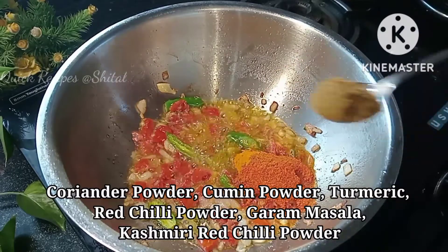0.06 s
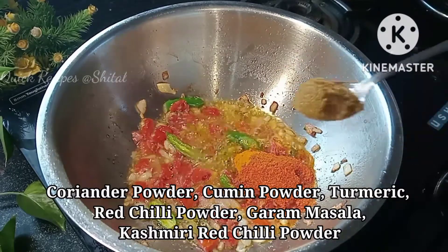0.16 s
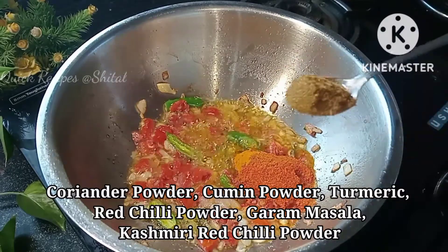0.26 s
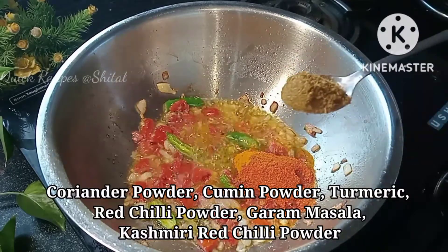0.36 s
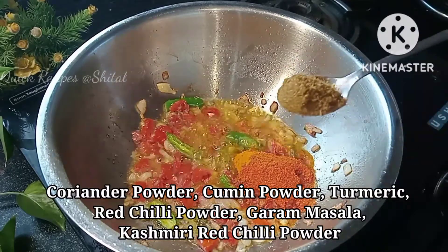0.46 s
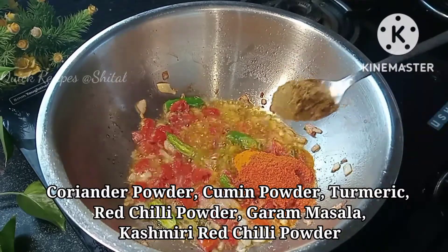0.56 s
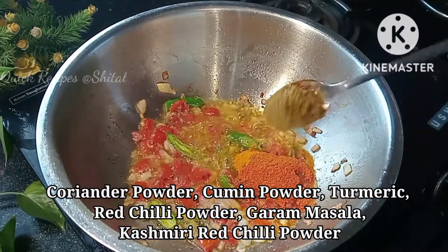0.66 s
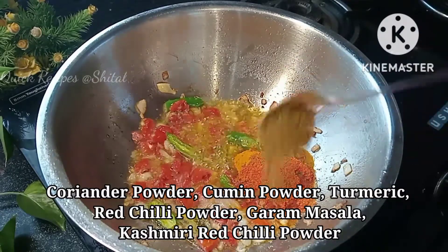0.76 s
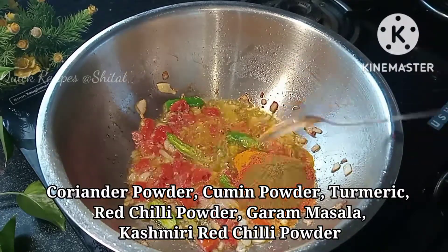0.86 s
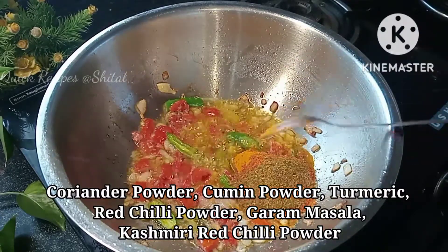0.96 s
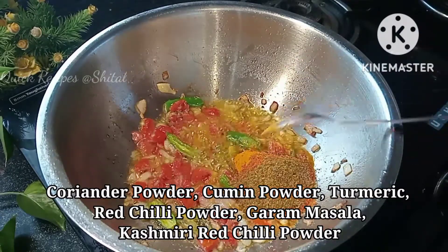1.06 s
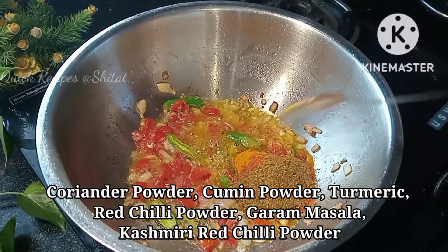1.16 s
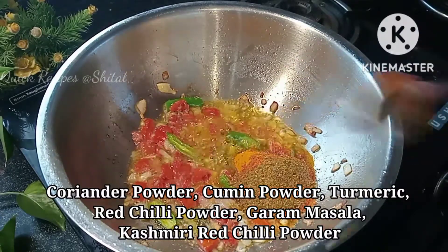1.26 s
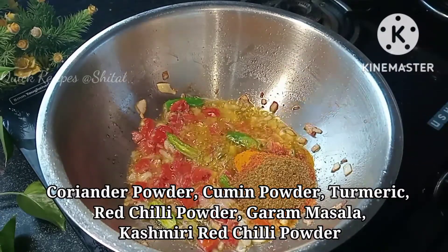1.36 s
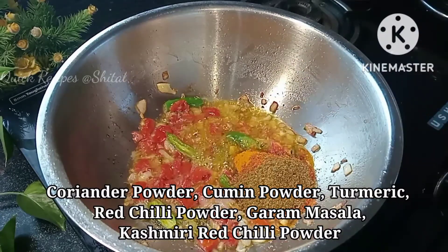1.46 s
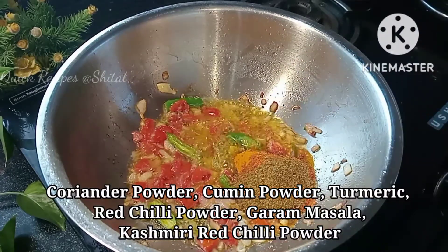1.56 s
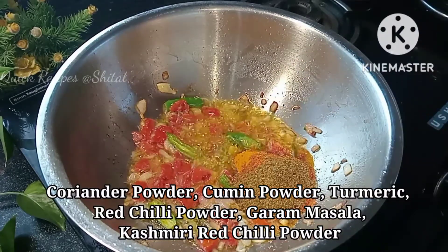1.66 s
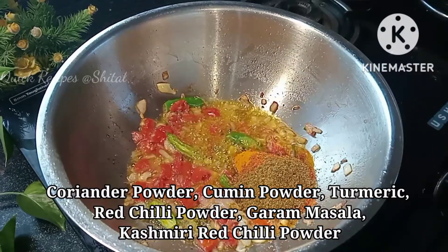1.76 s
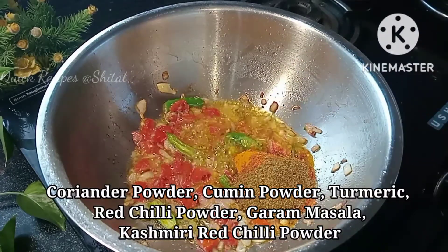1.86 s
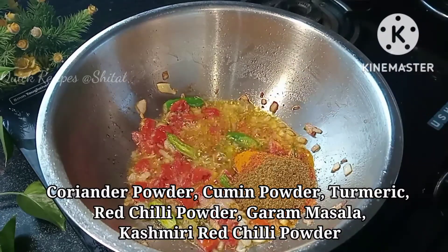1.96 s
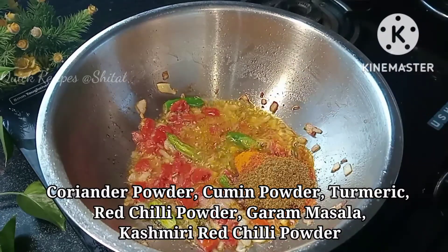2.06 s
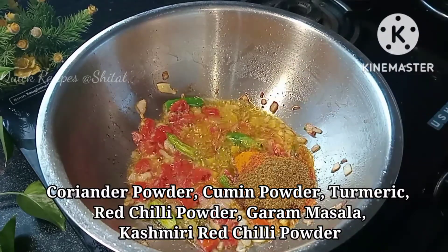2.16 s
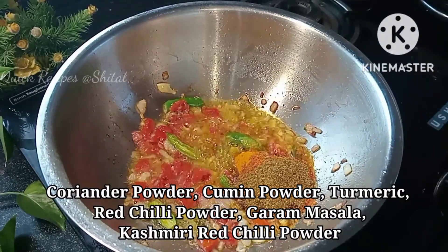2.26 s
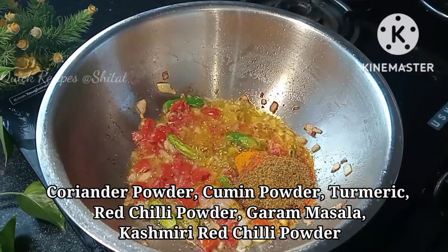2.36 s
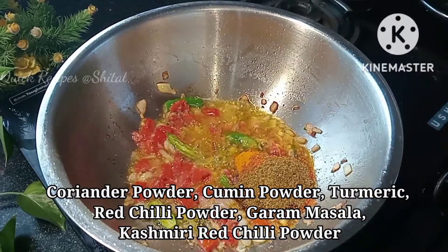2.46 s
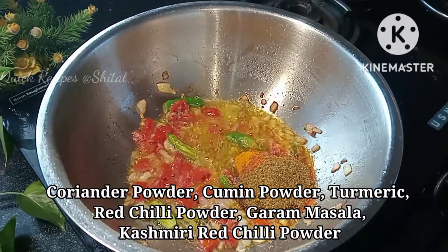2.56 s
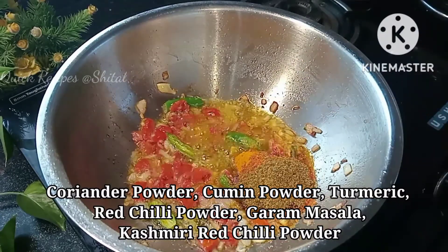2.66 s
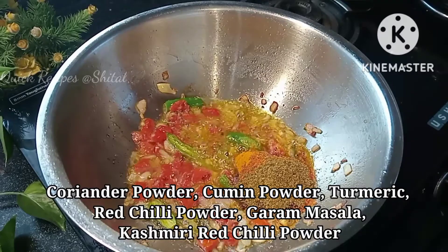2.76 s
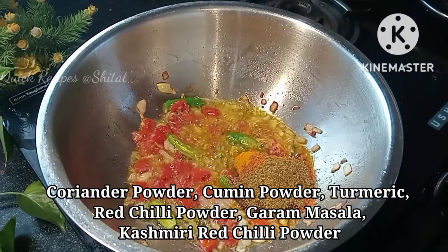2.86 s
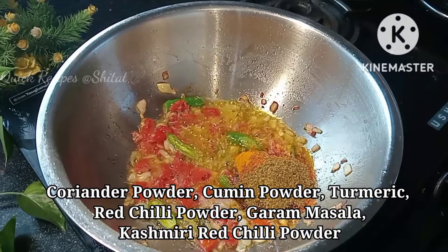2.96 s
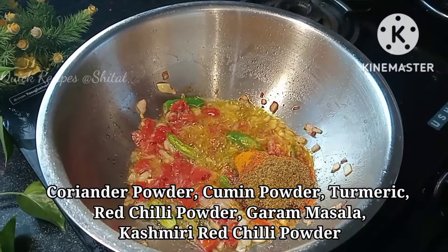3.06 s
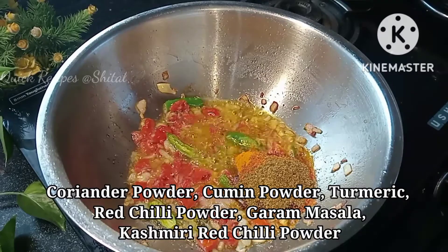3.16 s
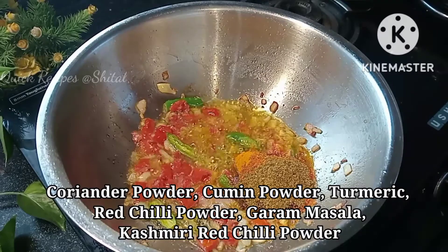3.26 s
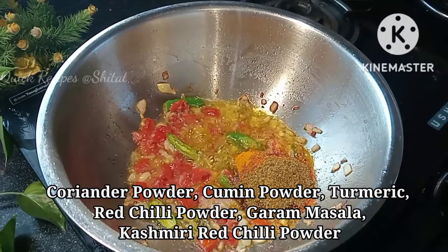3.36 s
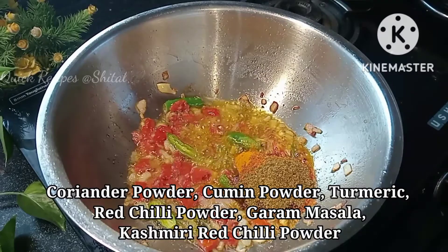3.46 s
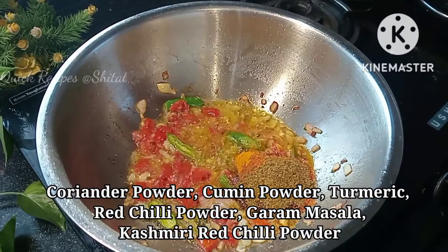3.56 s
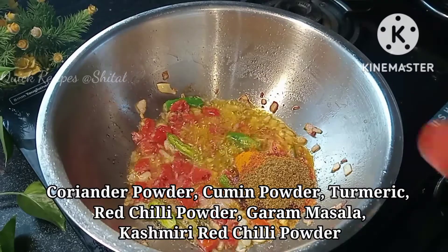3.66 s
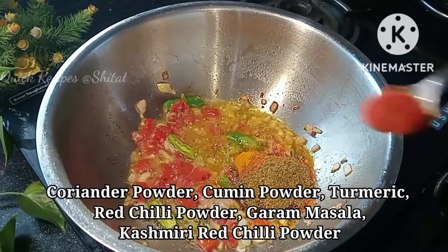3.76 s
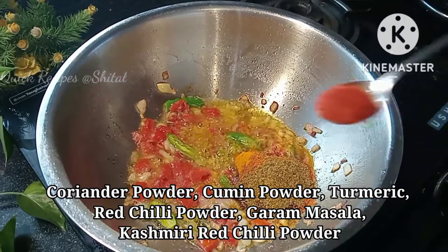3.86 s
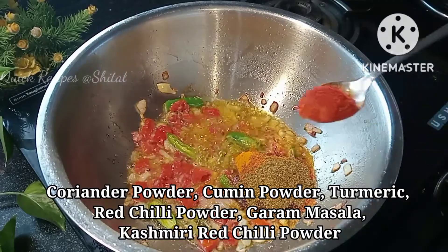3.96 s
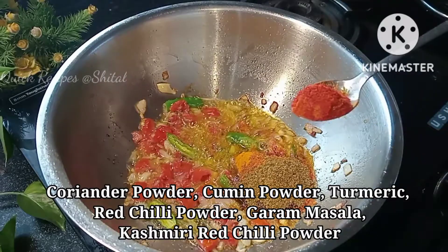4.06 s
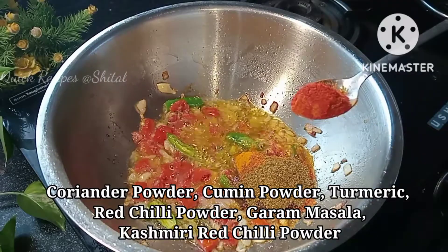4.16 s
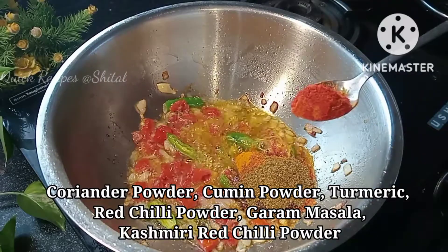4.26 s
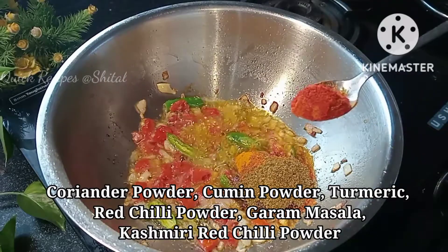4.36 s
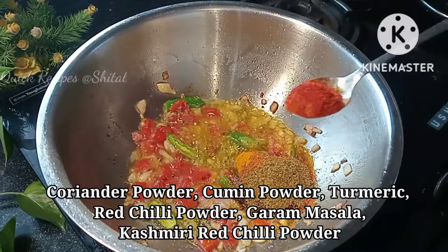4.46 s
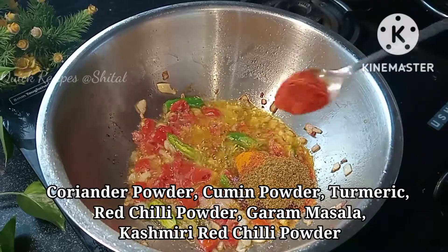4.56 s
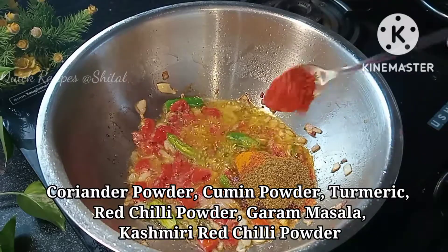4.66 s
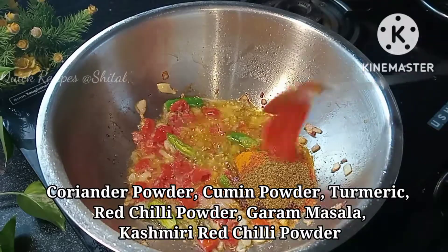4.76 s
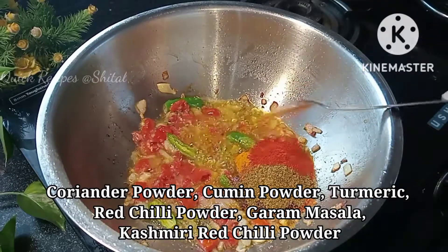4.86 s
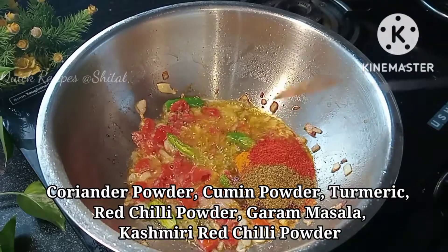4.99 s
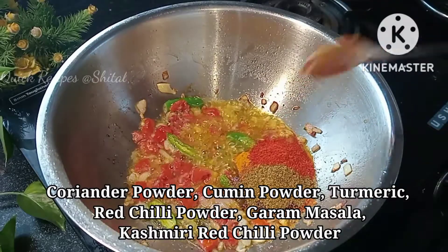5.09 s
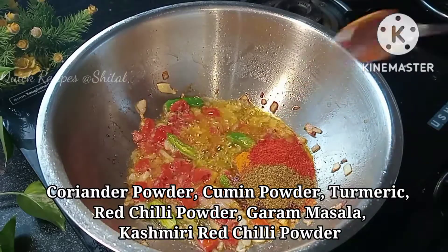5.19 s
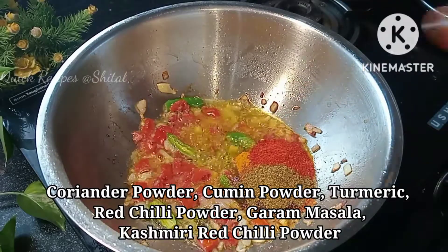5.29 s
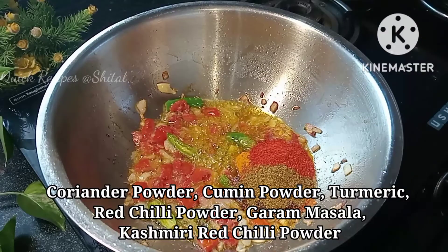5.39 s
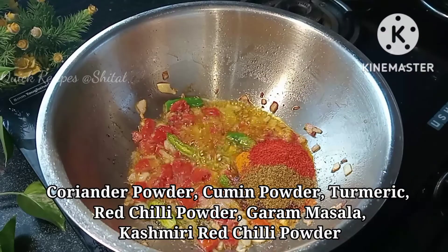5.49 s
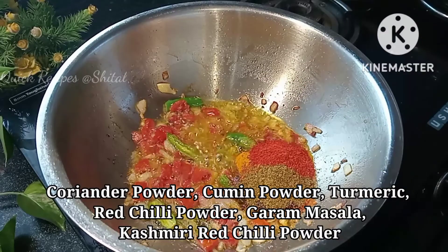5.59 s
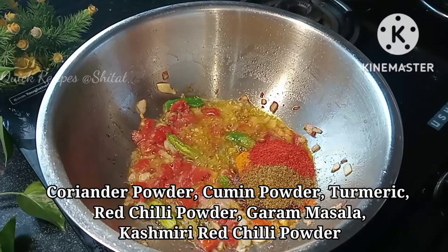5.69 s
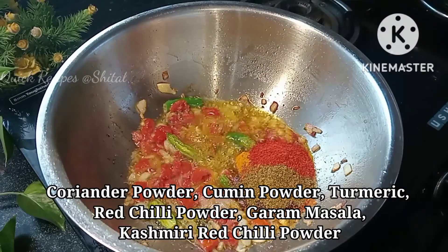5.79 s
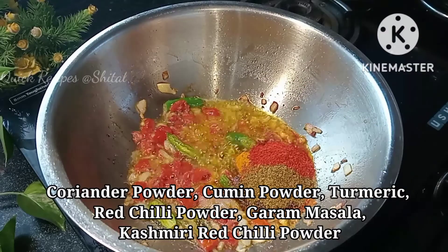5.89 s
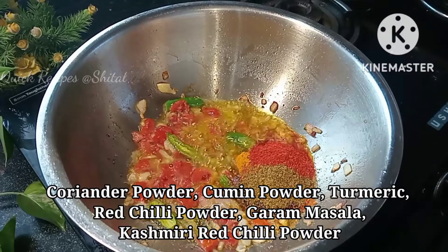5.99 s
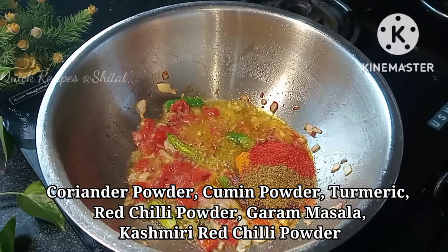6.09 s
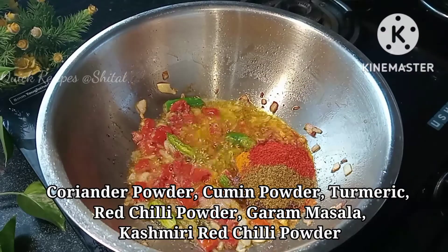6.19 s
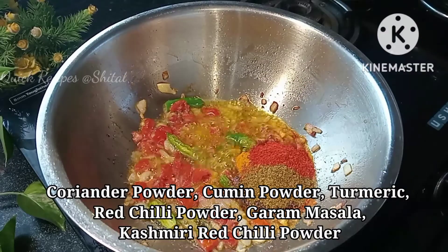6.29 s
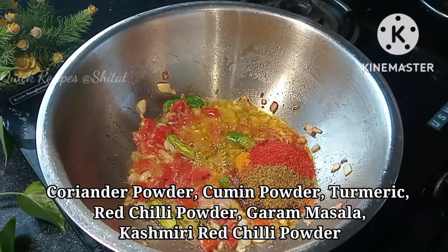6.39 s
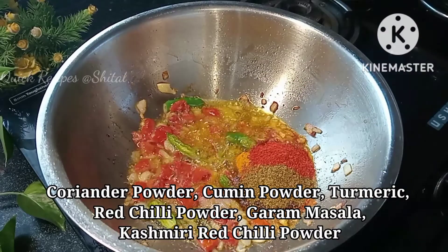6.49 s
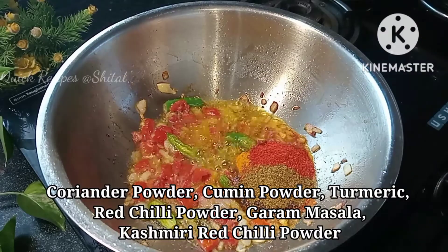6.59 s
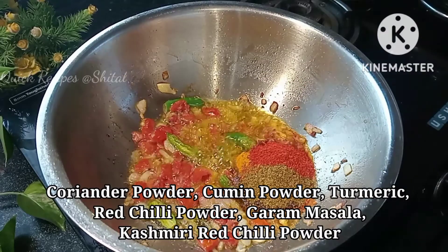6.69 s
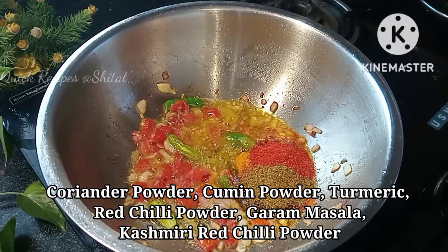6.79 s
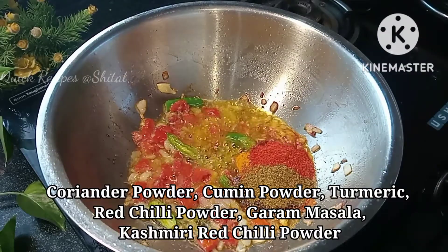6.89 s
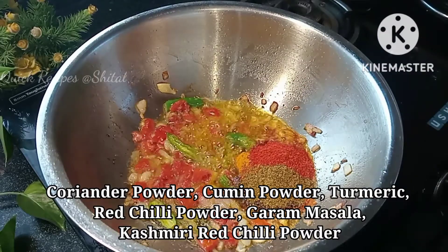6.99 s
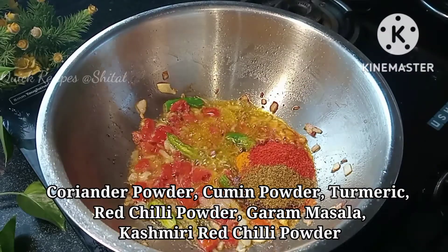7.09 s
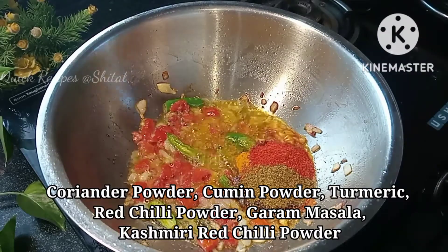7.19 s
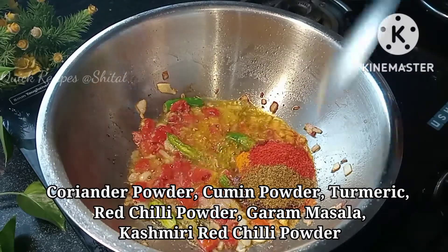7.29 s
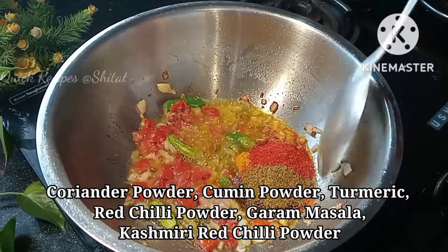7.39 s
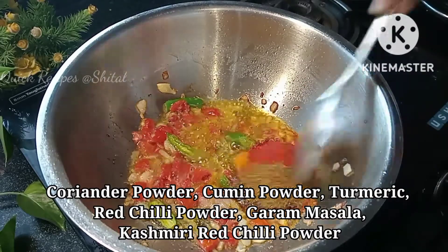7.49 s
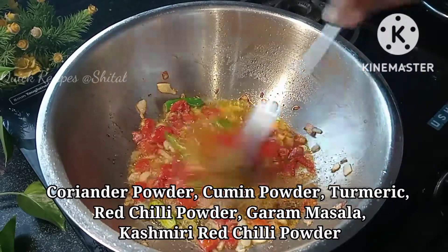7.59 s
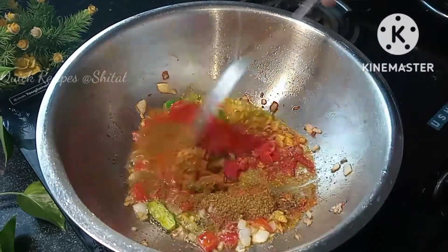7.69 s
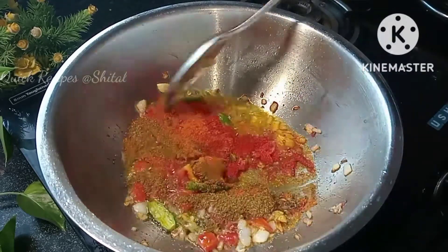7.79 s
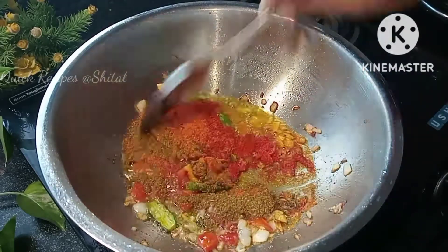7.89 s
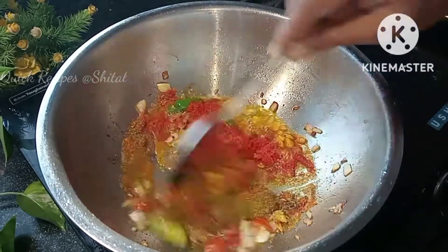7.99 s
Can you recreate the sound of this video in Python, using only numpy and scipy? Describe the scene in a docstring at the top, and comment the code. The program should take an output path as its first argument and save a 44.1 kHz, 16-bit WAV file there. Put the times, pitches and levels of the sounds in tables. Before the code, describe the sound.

Dense, crisp sizzling fills a close microphone, with irregular tiny oil spits and a low, hollow burner roar beneath. A faint teaspoon tink comes early, followed by soft thuds, then a sharper bright tap midway. Finally a steel ladle hits the wok with a high ring and rattle, and stirring makes the frying swell strongly. Slight room reflections, little deep bass.

```python
"""Frying: chopped vegetables sizzle in oil in a steel wok, a mass of random steam bursts over smooth hiss.
Filtered noise makes the gas flame's roar, and single drops of oil spit as very short blips with spray. A
teaspoon taps twice and a ladle strikes near the end: ringing modes plus rattling noise. Dull knocks and thuds
sound, with low booms as the wok rocks on its stand after the blows; a faint hum comes and goes, and last the
ladle scrapes round the pan while the sizzle is much louder."""
import sys
import numpy as np
from scipy import signal
from scipy.fft import rfft, irfft, next_fast_len
from scipy.io import wavfile

SR = 44100
rng = np.random.default_rng(int(sys.argv[2]) if len(sys.argv) > 2 else 0)


def generate_wav(sig):
    """Save sig (samples, or channels by samples) to the path in sys.argv[1] as 16-bit PCM at SR."""
    pcm = np.round(np.clip(np.atleast_2d(sig).T, -1, 1) * 32767).astype(np.int16)
    wavfile.write(sys.argv[1], SR, pcm)


N = 354563

# rim modes of the wok, lowest first: pitch_hz, level_db, t60_s (each blow scales level and t60)
WOK_MODES = [(345, -48, .55), (987, -39, .6), (1873, -38, .38), (2956, -33, .65), (4184, -32.5, .55),
             (5536, -39, .25), (6922, -29, .55), (8510, -36, .25)]
# modes of the teaspoon: pitch_hz, level_db (each blow shifts it), t60_s
SPOON_MODES = [(3157, -28, .07), (6869, -35, .35), (6930, -19, .13), (7052, -36, .55), (7827, -38, .15),
               (8188, -40, .35), (8320, -36, .25), (8680, -39, .28), (9254, -39, .35), (9549, -36, .4),
               (10048, -37, .28), (10150, -38, .32), (11270, -41, .35), (12040, -37, .35),
               (12088, -36, .22), (12300, -43, .3), (12640, -43, .35), (13790, -52, .4), (14550, -48, .26),
               (15110, -49, .25)]
# modes of the ladle: pitch_hz, level_db (each blow shifts it), t60_s
LADLE_MODES = [(2385, -47, .35), (5691, -37, .55), (5703, -33, .5), (6855, -39, .55), (8140, -36, .45),
               (8255, -40, .5), (8375, -38, .55), (8505, -38, .7), (8675, -39, .9), (9261, -31, .5),
               (9327, -34, .6), (9540, -32, .6), (9680, -34, .6), (10049, -45, .6), (10400, -38, .8),
               (10750, -44, .7), (12340, -48, .45), (12820, -43, .3), (13780, -49, .45), (14522, -47, .35)]


def from_db(db):
    """Turn decibels into a gain."""
    return 10 ** (np.asarray(db) / 20)


def rms_one(x):
    """Scale a sound to an rms of 1."""
    return x / np.sqrt(np.mean(x ** 2) + 1e-20)


def in_time(rows):
    """Columns of a table whose first column is seconds, one value a sample."""
    s, *columns = np.transpose(rows)
    return [np.interp(np.arange(N) / SR, s, column) for column in columns]


def colour(x, spectrum):
    """Filter a sound by a curve of (Hz, dB), joined by straight lines over log frequency."""
    size = next_fast_len(len(x))
    points = np.array(spectrum)
    hz = np.arange(size // 2 + 1) * SR / size + 1
    curve_db = np.interp(np.log(hz), np.log(points[:, 0]), points[:, 1])
    return irfft(rfft(x, size) * from_db(curve_db), size)[:len(x)]


def drift(rate_hz):
    """Slow chance: noise at every 20th sample through a double one-pole low-pass, rms 1."""
    r = np.exp(-40 * np.pi * rate_hz / SR)
    noise = rng.standard_normal(N // 20 + 3002)
    slow = signal.lfilter([1], [1, -2 * r, r * r], noise)[3000:]   # drop the filter's start-up
    return np.interp(np.arange(N) / 20, np.arange(len(slow)), rms_one(slow))


def resonate(x, hz, width_hz):
    """A two-pole resonance with gain 1 at its peak."""
    r = np.exp(-np.pi * width_hz / SR)
    feed = np.array([1, 0, -1]) * (1 - r * r) / 2
    return signal.lfilter(feed, [1, -2 * r * np.cos(2 * np.pi * hz / SR), r * r], x)


def add(out, s, sound):
    """Mix a short sound in at s seconds."""
    i = round(s * SR)
    out[i:i + len(sound)] += sound[:N - i]


def blip(hz, cycles):
    """A few cycles that swell fast and die, envelope height 1; also gives the seconds to the crest."""
    rise = cycles / hz / 9
    t = np.arange(round(12 * rise * SR) + 2) / SR
    swell = t / rise * np.exp(1 - t / rise)
    return np.cos(2 * np.pi * hz * (t - rise)) * swell, rise


def bubbles(per_s, spread_db, cycles, clump_db):
    """Steam bursts at random moments, sizes and pitches, each ringing a few cycles, in drifting clumps."""
    sizes = from_db(spread_db * np.minimum(rng.exponential(1, N), 4)) * rng.choice([-1, 1], N)
    born = rng.random(N) < per_s * from_db(clump_db * drift(25)) / SR
    pitches = np.geomspace(1000, 16000, 16)
    dealt = rng.integers(0, 16, N)
    out = 0
    for k, hz in enumerate(pitches):
        width = 3.14 * hz / cycles
        bursts = sizes * born * (dealt == k) + 1e-18
        out = out + resonate(resonate(bursts, hz, width), hz, width)
    return rms_one(out)


def sizzle(level_db):
    """Boiling in the oil: a dense fizz, a sparser crackle and the smooth hiss of steam, brightest near 9 kHz."""
    # colour of the sizzle: pitch_hz, level_db (per Hz)
    sizzle_colour = [(710, -59), (1200, -16), (1360, -9.5), (1860, -14), (2090, -10.5), (2320, -14),
                     (4600, -4), (7350, -9), (9300, 1.5), (9810, -1), (12100, -16), (14900, -16),
                     (15400, -9.5)]
    fizz = bubbles(14000, spread_db=1.5, cycles=5.35, clump_db=3.0)
    crackle = bubbles(600, spread_db=5.0, cycles=16.0, clump_db=3.0)
    steam = rng.standard_normal(N)
    crackle_db = -4 + 0.1 * (level_db - level_db[0])   # the crackle gains a little as the sizzle swells
    mix = fizz + from_db(crackle_db) * crackle + from_db(-2.0) * steam
    return from_db(level_db + 0.7 * drift(8)) * rms_one(colour(mix, sizzle_colour))


def flame(roar_db, hollow_db):
    """Gas flame: a broad roar with the hollow under the wok singing along, over a low rumble."""
    # colour of the roar: pitch_hz, level_db (per Hz)
    roar_colour = [(59, -31), (100, -27), (124, -8), (253, -4.5), (406, -6), (695, -8), (1070, -5),
                   (1360, -2.5), (1860, -7.5), (2500, -6.5), (3250, -5.5), (5500, -120)]
    # air resonances under the wok: pitch_hz, width_hz (of each of two passes), level_db (relative)
    air_modes = [(744, 252, 1.5), (1356, 170, -5)]
    rumble_hz, rumble_width_hz, rumble_db = 76, 30, -65.5
    broad = rms_one(colour(rng.standard_normal(N), roar_colour))
    air = rng.standard_normal(N) * from_db(2.5 * drift(27))
    hollow = 0
    for hz, width, db in air_modes:
        hollow = hollow + from_db(db) * rms_one(resonate(resonate(air, hz, width), hz, width))
    low = resonate(rng.standard_normal(N), rumble_hz, rumble_width_hz)
    low = rms_one(resonate(low, rumble_hz, 2 * rumble_width_hz))
    return from_db(roar_db) * broad + from_db(hollow_db) * hollow + from_db(rumble_db) * low


def spits():
    """Each drop bursts as a very short blip with a puff of spray, echoed faintly by the wok's curved wall."""
    # large drops of oil: crest_s, peak_db (before the colour), pitch_hz, length_cycles
    large_drops = [(0.089, -32, 1930, 6.6), (0.1378, -24, 4400, 5.2), (0.3601, -23, 6600, 11),
                   (0.4492, -20.5, 5200, 5.8), (0.5225, -22, 6540, 4.6), (0.5305, -12, 9500, 9),
                   (0.5929, -16, 11410, 11), (0.6629, -24.5, 2670, 4.4), (0.7042, -16, 3940, 8.9),
                   (0.8064, -19, 5200, 4.1), (0.8254, -19.5, 6050, 8.3), (0.9905, -26, 9500, 16),
                   (1.0321, -19, 12360, 5.5), (1.053, -11.5, 5460, 2.8), (1.2388, -18, 12060, 6.7),
                   (1.3194, -19, 11400, 7.2), (1.327, -11.5, 12150, 3.0), (1.55, -25.5, 2330, 3.5),
                   (1.6076, -23, 10140, 7.5), (1.6172, -21, 10030, 9.1), (1.978, -14, 8960, 17),
                   (2.0378, -18, 9050, 5.6), (2.0824, -21, 2720, 5.4), (2.1289, -23, 5840, 5.6),
                   (2.6198, -21, 7000, 6.4), (2.6702, -23, 4780, 4.5), (2.7376, -17, 9720, 4.5),
                   (3.0765, -18, 8700, 7.4), (3.2754, -5, 6300, 2.8), (3.3432, -12, 13840, 6),
                   (3.4448, -20, 4030, 2.7), (3.4743, -23, 5930, 3), (3.4888, -20, 12500, 14.0),
                   (3.5752, -22, 4430, 8.5), (3.589, -21, 8400, 9.2), (3.599, -37, 1950, 2.1),
                   (3.6, -9.5, 12580, 3.3), (3.6277, -14.5, 8100, 10), (3.663, -17, 12900, 7.5),
                   (3.7364, -24, 13970, 14.0), (3.7625, -21, 9070, 26), (3.928, -21.5, 8360, 12),
                   (3.9819, -21, 3400, 2.4), (4.025, -12, 12850, 4.1), (4.0868, -23, 9810, 11),
                   (4.0983, -13.5, 11400, 7.5), (4.1816, -14, 10300, 13), (4.2537, -16.5, 8740, 3.8),
                   (4.3711, -24, 4900, 11), (4.454, -25, 9600, 27), (4.9136, -25, 12840, 5.4),
                   (4.9617, -29, 4430, 14), (5.0743, -16.5, 10100, 8.2), (5.1055, -21, 11590, 8.7),
                   (5.132, -20.5, 4770, 2.8), (5.145, -12.5, 9600, 4.2), (5.299, -21.5, 4260, 5.2),
                   (5.494, -27.5, 5790, 14), (5.6042, -19, 9790, 4.3), (5.6815, -19.5, 8450, 5.7),
                   (5.7033, -18, 9300, 12), (5.7195, -14, 8350, 2.6), (5.76, -17, 11600, 22),
                   (5.8275, -25, 4520, 9), (5.849, -24, 6820, 4.9), (5.9059, -19, 9500, 8.5),
                   (6.1626, -15, 9100, 14), (6.1722, -20, 5750, 13), (6.192, -13, 13200, 12),
                   (6.3236, -18.5, 4930, 5.2), (6.3358, -18, 9300, 15), (6.4594, -21, 13190, 17),
                   (6.5851, -25.5, 5030, 13), (6.6365, -24.5, 8750, 15), (6.7287, -19.5, 6580, 2.5),
                   (6.9362, -19.5, 5260, 5.8), (6.9716, -16, 9800, 9.5), (6.9997, -22, 7900, 7.8),
                   (7.0755, -20.5, 9440, 13), (7.1334, -27, 4160, 7.1), (7.4394, -13.5, 9150, 22),
                   (7.476, -16, 4130, 4.5), (7.5242, -28, 4450, 18), (7.558, -14, 9400, 12),
                   (7.5667, -22, 4070, 12), (7.679, -21, 5000, 3), (7.7012, -15.5, 6800, 6.4),
                   (7.7105, -28.5, 1920, 9.7), (7.743, -29, 1770, 14.0), (7.8192, -11.5, 8600, 8.1)]
    # colour of all spits at the microphone: pitch_hz, level_db
    spit_colour = [(200, -36), (700, 1.5), (7000, -0.5), (9400, 0.5), (11500, -7), (15500, -10)]
    small_count, low_hz, high_hz = 160, 2200, 14400
    small_db, db_per_octave, spread_db = -38.5, 0.5, 2
    fewest_cycles, most_cycles = 2.3, 9
    echo_s, echo_db = 0.0015, -14
    spray_db, spray_t60_s, spray_width = -15, 0.017, 0.44   # level below the burst; width as share of pitch

    when, size, pitch, length = rng.random((small_count, 4)).T
    hz = low_hz * (high_hz / low_hz) ** pitch
    db = small_db + db_per_octave * np.log2(hz / low_hz) + spread_db * (2 * size - 1)
    longer = length * pitch   # only high drops may ring for many cycles
    cycles = fewest_cycles * (1 - longer) + most_cycles * longer
    small_drops = np.transpose([when * N / SR, db, hz, cycles])
    drops = np.vstack([small_drops, large_drops])

    out = np.zeros(N)
    t = np.arange(SR // 20) / SR
    for (s, db, hz, cycles), noise in zip(drops, rng.standard_normal((len(drops), len(t)))):
        burst, rise = blip(hz, np.clip(cycles, 2, 40))
        start = max(s - rise, 0)
        add(out, start, from_db(db) * burst)
        add(out, start + echo_s, -from_db(db + echo_db) * burst)
        spray = rms_one(resonate(noise, hz, spray_width * hz))
        add(out, s, from_db(db + spray_db - 60 * t / spray_t60_s) * spray)
    return colour(out, spit_colour)


def kitchen(x):
    """Diffuse room tail: slightly dulled noise dying away, starting after 4 ms."""
    t60_s = 0.3
    t = np.arange(SR // 2) / SR
    dull = signal.lfilter([1], [1, -.3], rng.standard_normal(len(t)))
    tail = dull * from_db(-60 * t / t60_s) * (t > .004)
    return signal.fftconvolve(x, tail / np.sqrt(np.sum(tail ** 2)))[:N]


def hum():
    """Faint low sine tones that swell and fade."""
    # hum tones: start_s, end_s, pitch_hz, level_db (rms before the swell)
    hum_tones = [(0.054, 0.21, 239, -62), (1.909, 2.1, 237, -65), (6.247, 6.517, 213, -64)]
    out = np.zeros(N)
    for start, end, hz, db in hum_tones:
        t = np.arange(round((end - start) * SR)) / SR
        swell = np.sin(np.pi * t / (end - start)) ** .5
        add(out, start, from_db(db) * np.sqrt(2) * np.sin(2 * np.pi * hz * t) * swell)
    return out


def ring(hz, t60, phase, beat_hz, depth):
    """A struck mode dies 60 dB in t60 while its level wavers, as a close pair of modes beats."""
    t = np.arange(round(t60 * SR) + 2) / SR
    waver = 1 + depth * np.cos(2 * np.pi * beat_hz * t)
    return np.sin(2 * np.pi * hz * t + phase) * from_db(-60 * t / t60) * waver


def chimes(strikes, tool_modes):
    """Rim modes, weighted by where and how hard the blow lands, and the modes of the tool itself."""
    tilt_centre_hz = 3000   # a soft blow tilts the rim modes about this pitch
    out = np.zeros(N)
    for s, wok_db, place, tilt_db, longer, tool_db in strikes:
        for waves, (hz, db, t60) in enumerate(WOK_MODES, 2):
            shape = np.cos(np.pi * waves * place)   # standing wave round the rim
            level = from_db(wok_db + db + tilt_db * np.log2(hz / tilt_centre_hz))
            add(out, s, level * shape * ring(hz, longer * t60, 0, rng.uniform(4, 10), depth=.2))
        for hz, db, t60 in tool_modes:
            phase = rng.uniform(0, 2 * np.pi)   # each tool mode starts at a random phase
            add(out, s, from_db(tool_db + db) * ring(hz, t60, phase, rng.uniform(6, 20), depth=.3))
    return out


def blows():
    """The clear ringing of wok and tool: two teaspoon taps, then the ladle."""
    # blows: start_s, wok_db, rim_place (0-1), tilt_db (per octave), ring_length (factor on t60), tool_db
    strikes = [(.7522, -2, .4, -2.5, .9, -10), (4.6365, 0, .02, .5, 1.1, 1), (7.2165, -15, .36, -4, 4, 3)]
    return chimes(strikes[:2], SPOON_MODES) + chimes(strikes[2:], LADLE_MODES)


def crashes(contacts, modes, width_hz, broad_db, cut_hz):
    """Rattling contact: dying noise that clusters round the given modes, over a broad crack."""
    # colour of the dense small modes of the steel: pitch_hz, level_db (per Hz)
    steel_colour = [(150, -29), (400, -16.5), (2000, -4.5), (4000, -8), (6000, -7.5), (8300, 4),
                    (10200, 3.5), (11200, -0.5), (12300, -3), (13500, -8), (15500, -14.5)]
    out = np.zeros(N)
    noise = rng.standard_normal((len(contacts), 2, SR // 2))
    t = np.arange(SR // 2) / SR
    high = signal.butter(2, cut_hz, "high", fs=SR, output="sos")
    crack = from_db(5.0 - 60 * t / 0.015)   # dies 60 dB in 15 ms
    for (s, db, t60), (rattle, hiss) in zip(contacts, noise):
        tuned = 0
        for hz, mode_db, _ in modes:
            tuned = tuned + from_db(mode_db / 2) * resonate(resonate(rattle, hz, width_hz), hz, width_hz)
        broad = rms_one(signal.sosfilt(high, colour(hiss, steel_colour)))
        fade = from_db(-60 * t / t60)
        body = (rms_one(tuned) + from_db(broad_db) * broad) * fade
        add(out, s, from_db(db) * (body + broad * crack))
    return out


def spoon_rattle():
    """Every contact and bounce of the teaspoon shakes spoon and upper wok modes."""
    # teaspoon contacts: start_s, level_db, t60_s
    contacts = [(0.753, -26, 0.14), (0.768, -34, .1), (.776, -32.5, 0.23), (4.6359, -16, 0.067),
                (4.649, -26, 0.15), (4.66, -25, 0.18)]
    modes = [*SPOON_MODES, *WOK_MODES[3:]]
    return crashes(contacts, modes, width_hz=110, broad_db=-4, cut_hz=250)


def knocks():
    """Dull knocks and thuds: a low blip with a puff of noise dying around the same pitch."""
    # knocks and thuds, some under the blows on the wok (the 85 Hz rows: the wok rocking on its stand): #
    # start_s, peak_db (of the blip), pitch_hz, decay_s (the puff falls 60 dB in 2.97 times this)
    thuds = [(0.779, -51, 85, 0.75), (.868, -33, 900, .02), (1.006, -39, 900, .02),
             (1.326, -30.5, 750, 0.025), (1.39, -36, 700, 0.039), (1.59, -31, 805, 0.068),
             (1.652, -29.5, 555, 0.019), (1.762, -42, 202, 0.059), (1.79, -43, 600, 0.046),
             (2.082, -28.5, 790, 0.048), (2.084, -34, 1690, 0.07), (2.148, -33.5, 250, 0.041),
             (2.185, -41, 396, .04), (2.225, -34.5, 970, 0.023), (2.256, -36, 600, 0.028),
             (3.275, -31, 1550, 0.019), (3.95, -35, 855, 0.12), (4.648, -23.5, 480, 0.12),
             (4.69, -50, 85, 1.2), (5.826, -32, 910, 0.039), (7.215, -46, 1350, 0.028),
             (7.269, -50, 85, 0.36)]
    out = np.zeros(N)
    noise = rng.standard_normal((len(thuds), SR // 2))
    t = np.arange(SR // 2) / SR
    for (s, db, hz, decay), puff in zip(thuds, noise):
        add(out, s, from_db(db) * blip(hz, 3.2)[0])
        dull = rms_one(resonate(resonate(puff, hz, 0.83 * hz), hz, 2.6 * hz))
        onset = np.minimum(t * hz, 1)   # fades in over one cycle
        add(out, s, from_db(db - 9.5 - 60 * t / (2.97 * decay)) * dull * onset)
    return out


def ladle_rattle():
    """Every contact and bounce of the ladle shakes its own modes."""
    # ladle contacts: start_s, level_db, t60_s
    contacts = [(7.2165, -14, 0.081), (7.232, -40, 0.088), (7.263, -29, 0.53)]
    return crashes(contacts, LADLE_MODES, width_hz=150, broad_db=-6, cut_hz=1020)


def stirring():
    """Dense uneven slips of the ladle edge, rung through the pan; the stroke bites, then eases."""
    # scrape resonances of the pan: pitch_hz, width_hz, level_db (relative)
    scrape_modes = [(1300, 500, -2.5), (1920, 850, -5), (4300, 1000, 5)]
    start_s, bite_s, level_db, ease_db_per_s = 7.695, 0.044, -37, 24
    grit = from_db(2.6 * np.minimum(rng.exponential(1, N), 4))
    slips = rng.standard_normal(N) * grit * from_db(4.0 * drift(35))
    rung = sum(from_db(db) * rms_one(resonate(slips, hz, width)) for hz, width, db in scrape_modes)
    t = np.arange(N) / SR - start_s
    bite = np.clip(t / bite_s, 0, 1)
    stroke = bite * from_db(level_db - ease_db_per_s * np.maximum(t, 0))
    return stroke * rms_one(rung)


def scene():
    """Frying, flame and ringing steel stay dry; spits, knocks and rattles carry a room tail."""
    # levels over time, steady with small swells, then a much louder sizzle in the last second:
    # time_s, sizzle_db (before a slow drift), roar_db (broad), hollow_db (before its mode levels)
    frying_levels = [(0, -41, -54.5, -58), (2.45, -41.5, -55, -57.5), (4.5, -41.5, -56.5, -57.5),
                     (4.8, -41.5, -51.5, -56.5), (5.6, -41.5, -56.5, -59), (6.35, -42.5, -55.5, -57.5),
                     (7.0, -41.5, -52, -66.5), (7.22, -41.5, -51, -72), (7.38, -33, -48.5, -58),
                     (7.66, -39.5, -53, -67), (7.77, -30.5, -45.5, -60), (7.93, -28, -53, -56.5),
                     (8.04, -29, -54, -54)]
    sizzle_db, roar_db, hollow_db = in_time(frying_levels)
    events = spits() + spoon_rattle() + knocks() + ladle_rattle()
    steady = sizzle(sizzle_db) + flame(roar_db, hollow_db) + hum() + stirring()
    room = from_db(-13) * kitchen(events)
    return (steady + blows() + events + room)[None]


def record(dry):
    """Two fades down and back up; the microphone drops the deep bass and the top is cut steeply."""
    # the sound dips once at 2.27 s, and near 7.2 s it fades down and snaps back:
    # lowest_s, depth_db, fall_s, return_s
    fades = [(2.27, -5.5, 0.061, .04), (7.211, -15, 0.029, 0.0027)]
    bass_cut_hz, top_cut_hz = 66, 15650
    fade_db = sum(in_time([(s - fall, 0), (s, db), (s + back, 0)])[0] for s, db, fall, back in fades)
    high_pass = signal.butter(2, bass_cut_hz, "high", fs=SR, output="sos")
    low_pass = signal.cheby2(16, 42, top_cut_hz, fs=SR, output="sos")
    thin = signal.sosfilt(high_pass, dry * from_db(fade_db))
    return signal.sosfilt(low_pass, thin)


dry = scene()
out = record(dry)
generate_wav(out)
```